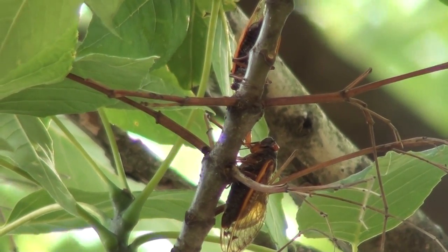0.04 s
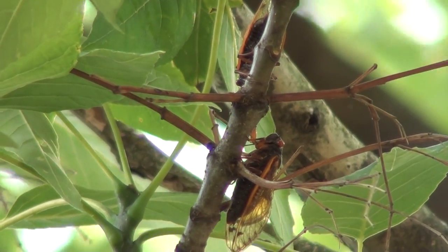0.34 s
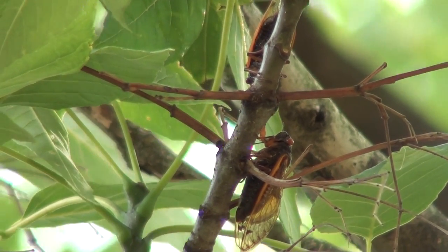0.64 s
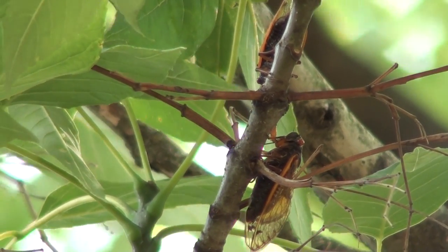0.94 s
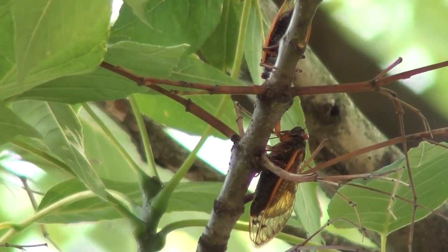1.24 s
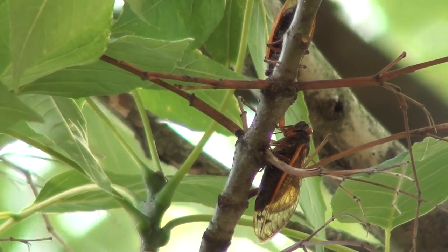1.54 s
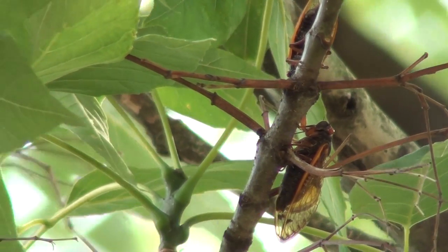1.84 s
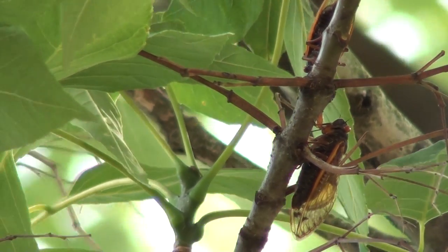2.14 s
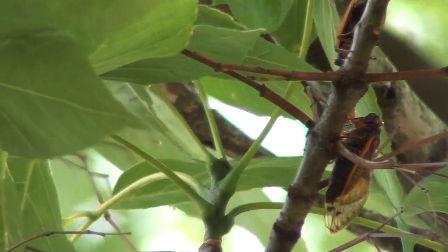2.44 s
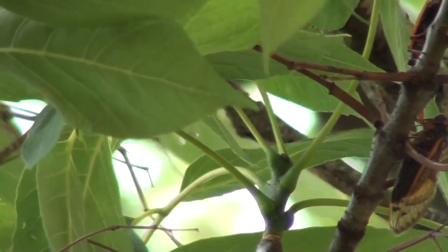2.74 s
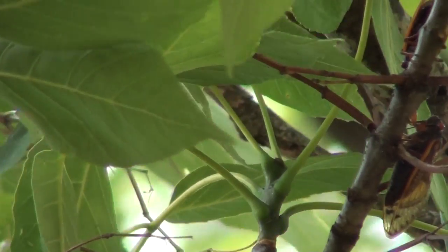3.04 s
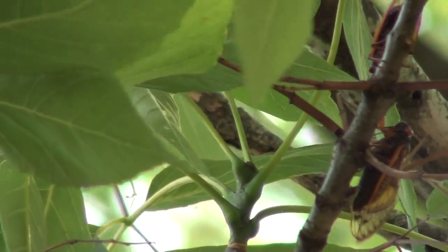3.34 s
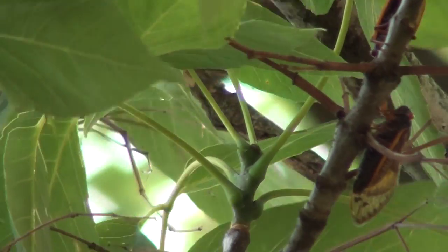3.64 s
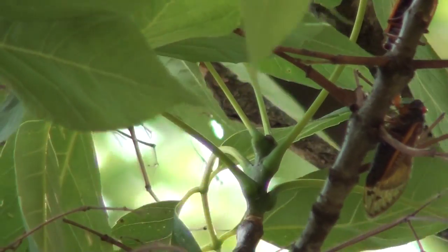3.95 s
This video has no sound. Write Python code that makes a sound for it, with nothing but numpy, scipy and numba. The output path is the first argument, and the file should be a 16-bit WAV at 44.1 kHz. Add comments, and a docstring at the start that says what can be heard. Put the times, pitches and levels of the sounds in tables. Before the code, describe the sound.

A dense chorus of cicadas buzzes in the trees, high, loud and steady.

```python
"""Summer trees with a dense chorus of periodical cicadas. Each insect buckles its tymbals hundreds of
times a second and rings its hollow abdomen near 6 kHz; a few are close, the rest merge into a hiss
scattered by the leaves. Far quieter: a distant rumble, a faint hum and the low drone of a second cicada
species. A fast limiter holds the level."""
import sys
import numpy as np
from scipy import signal
from scipy.fft import rfft, irfft
from scipy.io import wavfile
from scipy.ndimage import uniform_filter1d, minimum_filter1d, map_coordinates
from numba import njit

SR = 44100
rng = np.random.default_rng(int(sys.argv[2]) if len(sys.argv) > 2 else 0)


def digitize_waveform(pressure):
    """Quantize a signal to 16-bit integers and store it at the path in sys.argv[1].

    Rows of a 2-D input are taken as channels; values are limited to [-1, 1].
    """
    field = np.atleast_2d(pressure).T
    bounded = np.clip(field, -1, 1)
    quanta = np.round(bounded * 32767).astype(np.int16)
    wavfile.write(sys.argv[1], SR, quanta)


N = 176400

BACKGROUND_SIDE_DB = -11
CLICK_HZ, CLICK_SPREAD, CLICK_JITTER = 270, .25, .07  # spread between insects and wobble: log units
SWELL_HZ, SWELL_DB = 1.5, 1.5
LEAF_T60_S, LEAF_DB, CANOPY_T60_S = .05, -3, .35
LIMIT_DB, LIMIT_ATTACK_S, LIMIT_RELEASE_S, MAKEUP_DB = -12, .0002, .012, 4


def undb(db):
    """Decibels to gain."""
    return 10 ** (np.asarray(db) / 20)


def level(x, db):
    """Set the rms level."""
    return x * undb(db) / np.sqrt(np.mean(x ** 2))


def freqs():
    """Bin frequencies in Hz, floored at 1."""
    return np.maximum(np.arange(N // 2 + 1) * SR / N, 1)


def contour(points):
    """Gain per bin from (frequency [Hz], level [dB]) points."""
    hz, db = np.array(points).T
    return undb(np.interp(np.log(freqs()), np.log(np.sort(hz)), db))


def timeline(points):
    """Level per sample from (time [s], level [dB]) points."""
    return np.interp(np.arange(N) / SR, *np.array(points).T)


def walk(hz):
    """Random drift with spread 1."""
    knots = rng.standard_normal(1024)
    return map_coordinates(knots, [np.arange(N) * hz / SR], order=1, mode="wrap") * np.sqrt(3 / 2)


def band(hz, width_hz):
    """Noise in one narrow resonance."""
    return irfft(rfft(rng.standard_normal(N)) / (1 + ((freqs() - hz) / width_hz * 2) ** 2), N)


def stereo(mid, side):
    """Left and right from mid and side."""
    return np.array([mid + side, mid - side])


def scatter(x, t60_s):
    """Dense small reflections that die away."""
    tail = rng.standard_normal(N) * np.exp(-np.log(1000) * np.arange(N) / SR / t60_s)
    return irfft(rfft(x) * rfft(tail / np.sqrt(np.sum(tail ** 2))), N)


def rumble(mono_below_hz=350):
    """Distant rumble and air: dark noise, centred in the bass."""
    # noise spectrum (frequency [Hz], relative density [dB])
    air = [(15, -47), (25, -15), (103, -1), (200, -4), (234, -5), (262, -9), (435, -9.5), (1220, -8.5),
           (1480, -8), (2020, -9.5), (2600, -13.5), (3380, -44), (5720, -120)]
    corner_hz = 2 * air[-1][0]
    colour = contour(air) / (1 + (freqs() / corner_hz) ** 2)
    mid, side = rfft(rng.standard_normal((2, N))) * colour
    side = side * undb(BACKGROUND_SIDE_DB) / (1 + (mono_below_hz / freqs()) ** 4)
    return stereo(irfft(mid, N), irfft(side, N))


def hum():
    """Faint hum: narrow bands of low noise."""
    # hum bands (centre [Hz], width [Hz], level [dB])
    bands = [(108, 26, -67), (234, 4, -68.5)]
    return sum(level(band(hz, width_hz), db) for hz, width_hz, db in bands)


def drone(hz=1485, width_hz=110):
    """A second cicada species, far off, merged into one band."""
    return stereo(band(hz, width_hz), undb(BACKGROUND_SIDE_DB) * band(hz, width_hz))


def background():
    """Rumble, hum and drone, sinking slowly together."""
    # background envelope (time [s], relative level [dB])
    envelope = [(0.05, -52.5), (0.26, -53.5), (0.27, -54.5), (1.0, -53), (2.84, -59), (3.9, -57.5)]
    gain = level(undb(timeline(envelope)), 0)
    return (level(rumble(), db=-55.5) + hum() + level(drone(), db=-67)) * gain


def tymbal():
    """One insect's buckling tymbals: a click train of wavering rate and strength."""
    offset = CLICK_SPREAD * rng.standard_normal()
    wobble = CLICK_JITTER * (walk(SWELL_HZ) + 2 * walk(CLICK_HZ))
    rate_hz = CLICK_HZ * np.exp(offset + wobble)
    cycles = rng.random() + np.cumsum(rate_hz) / SR
    clicks = np.diff(np.floor(cycles), prepend=0)
    return clicks * undb(SWELL_DB * walk(SWELL_HZ))


def abdomen(clicks, pitch):
    """Each click rings the hollow body; a smaller insect rings higher."""
    # ring of one click (frequency [Hz], relative density [dB])
    ring = [(1400, -73), (2400, -47.5), (3000, -36), (3500, -24.5), (4000, -17), (4400, -14), (4900, -14.5),
            (5400, -7.5), (5900, -1.1), (6350, 0.5), (6900, -2.5), (7700, -12.5), (8500, -16),
            (9700, -29.5), (10700, -33.5), (12200, -36.5), (14000, -44.5), (15700, -51)]
    low_cut_hz = ring[0][0] / 2
    gain = contour([(hz * pitch, db) for hz, db in ring]) / np.sqrt(1 + (low_cut_hz / freqs()) ** 2)
    # minimum phase: the ring follows the click
    cepstrum = irfft(np.log(gain), N)
    cepstrum[1:N // 2] *= 2
    cepstrum[N // 2 + 1:] = 0
    return irfft(rfft(clicks) * np.exp(rfft(cepstrum)), N)


def far_cicadas(count=12, side_db=-14.5):
    """The crowd in the canopy, its clicks smeared into a hiss."""
    crowd = [tymbal() for _ in range(count)]
    mid, side = (sum(scatter(clicks, CANOPY_T60_S) for clicks in crowd) for _ in range(2))
    return abdomen(stereo(mid, undb(side_db) * side), pitch=1)


def near_cicadas(count=8, max_pan=.45, pitch_spread=.015, flutter_db=5, flutter_hz=28):
    """Single buzzes across the nearest branches, with short echoes off the leaves."""
    out = 0
    for pan in np.linspace(-max_pan, max_pan, count):
        clicks = tymbal() * undb(flutter_db * walk(flutter_hz))
        buzz = abdomen(clicks, pitch=np.exp(pitch_spread * rng.standard_normal()))
        buzz = level(buzz + undb(LEAF_DB) * scatter(buzz, LEAF_T60_S), 0)
        out = out + stereo(buzz, pan * buzz)
    return out


def chorus(body_hz=6350, body_sigma_hz=900, flutter_db=.47, flutter_hz=24):
    """Near and far cicadas: a steady body tone, with a fluttering rasp above and below it."""
    # stereo width (frequency [Hz], side gain [dB])
    width = [(3000, 1), (6300, 0), (8500, -1.5), (10500, -6), (14000, -20)]
    # balance (frequency [Hz], left minus right [dB])
    balance = [(3000, -1.4), (6300, -1.14), (9000, -.5), (12000, 0)]
    # rasp envelope (time [s], gain [dB])
    rasp_envelope = [(0, 0.3), (1.1, -0.5), (1.5, 0.2), (1.85, -0.5), (2.25, 0.5), (2.9, -0.76), (4, 0)]
    left, right = rfft(level(near_cicadas(), db=-22.5) + level(far_cicadas(), db=-16))
    spectrum = stereo(left + right, (left - right) * contour(width)) / 2
    spectrum *= contour(balance) ** np.array([[.5], [-.5]])
    body_band = np.exp(-.5 * ((freqs() - body_hz) / body_sigma_hz) ** 2)
    body = irfft(spectrum * body_band, N)
    rasp = irfft(spectrum * (1 - body_band), N)
    rasp_db = timeline(rasp_envelope) + flutter_db * walk(flutter_hz)
    return body + rasp * undb(rasp_db)


def scene():
    """The chorus over its quiet background."""
    return chorus() + background()


@njit
def follow(size, attack, release, start):
    """Peak follower: fast rise, slow fall."""
    out, envelope = np.empty(len(size)), start
    for i in range(len(size)):
        envelope += (size[i] - envelope) * (attack if size[i] > envelope else release)
        out[i] = envelope
    return out


def record(dry):
    """Fast look-ahead limiter, make-up gain, steep low-pass."""
    threshold = float(undb(LIMIT_DB))
    attack, release = 1 / (LIMIT_ATTACK_S * SR), 1 / (LIMIT_RELEASE_S * SR)
    peak = follow(np.abs(dry).max(axis=0), attack, release, threshold)
    gain = minimum_filter1d(threshold / np.maximum(peak, threshold), size=64)
    gain = uniform_filter1d(uniform_filter1d(gain, size=48), size=48) * undb(MAKEUP_DB)
    low_pass = signal.ellip(10, .1, 80, 15750, fs=SR, output="sos")
    return signal.sosfilt(low_pass, dry * gain)


dry = scene()
out = record(dry)
digitize_waveform(out)
```